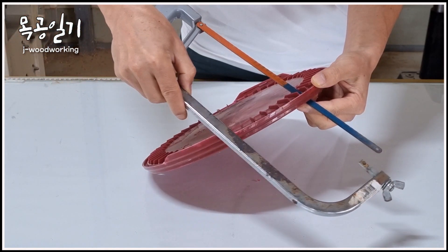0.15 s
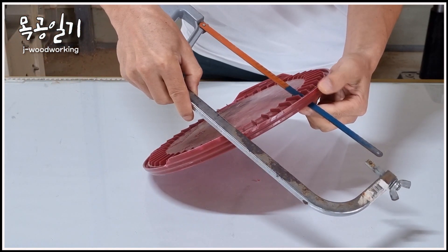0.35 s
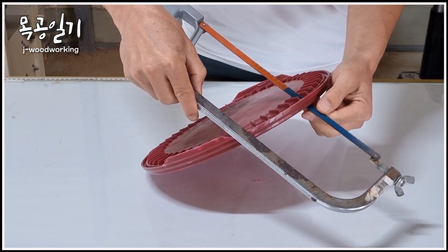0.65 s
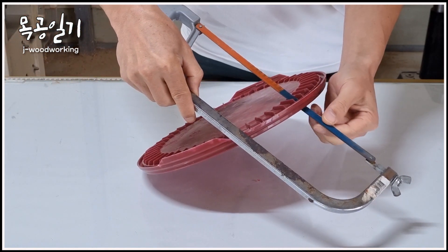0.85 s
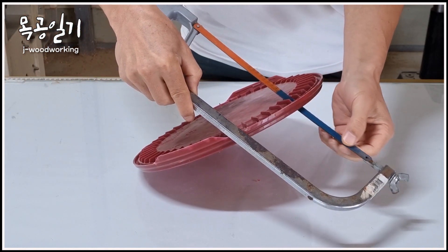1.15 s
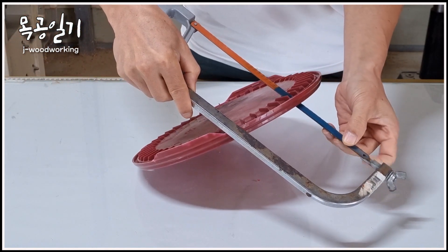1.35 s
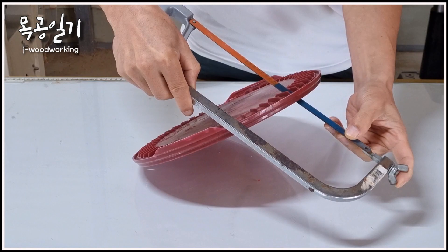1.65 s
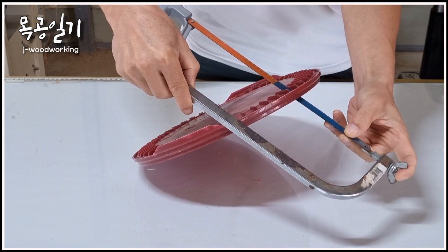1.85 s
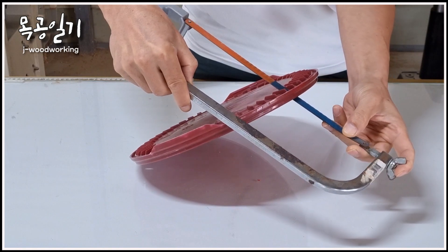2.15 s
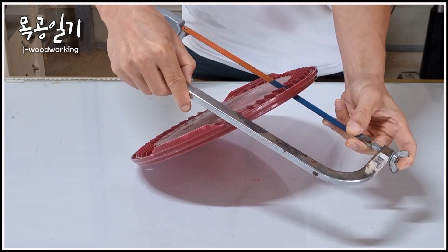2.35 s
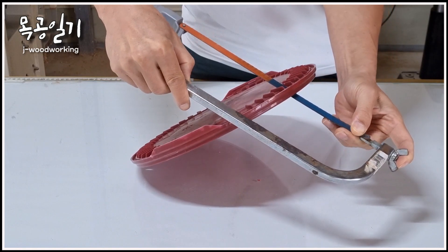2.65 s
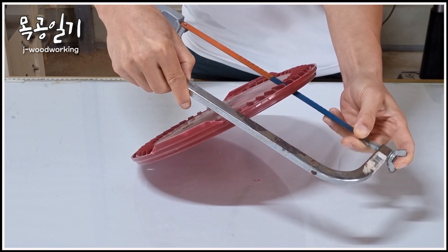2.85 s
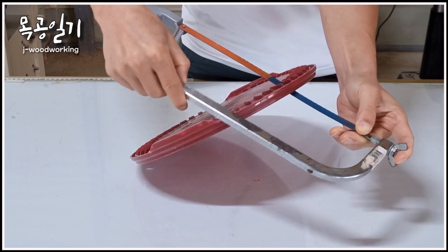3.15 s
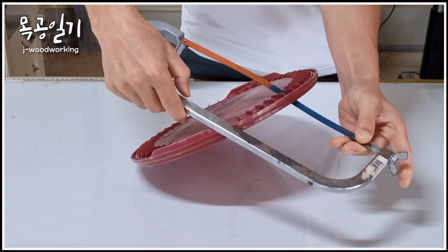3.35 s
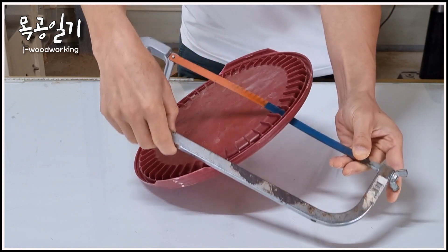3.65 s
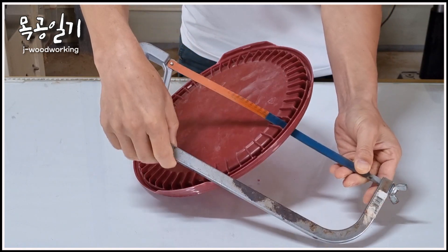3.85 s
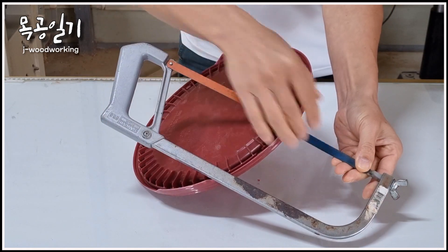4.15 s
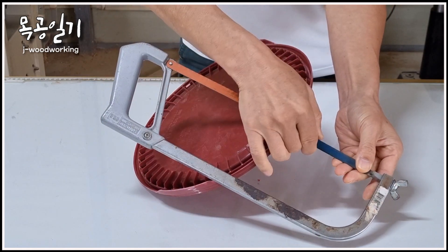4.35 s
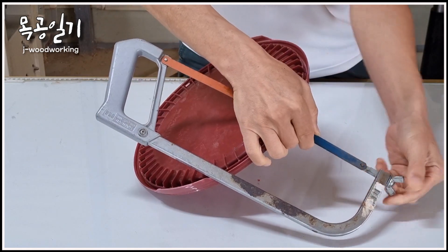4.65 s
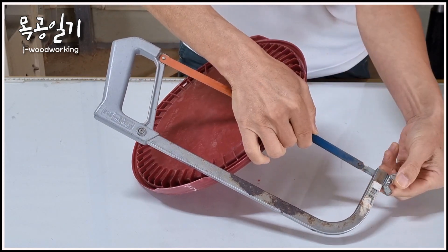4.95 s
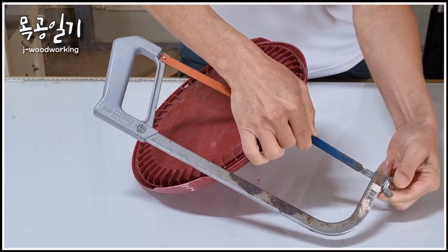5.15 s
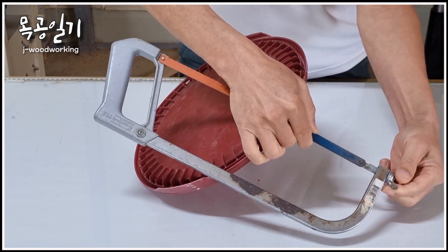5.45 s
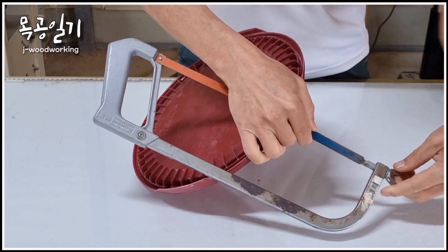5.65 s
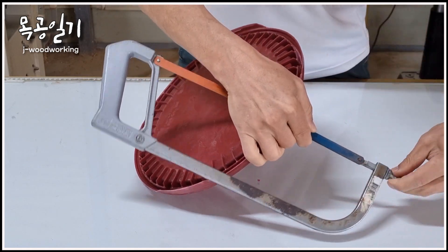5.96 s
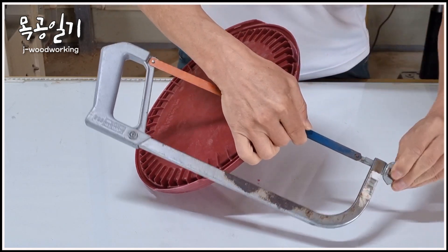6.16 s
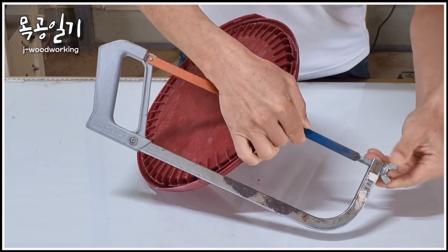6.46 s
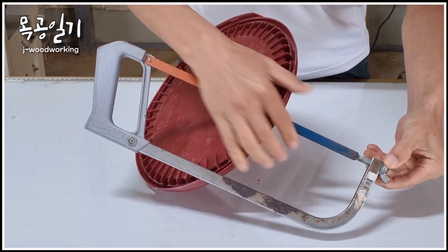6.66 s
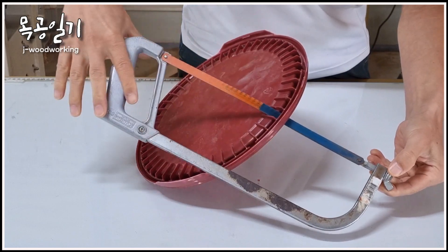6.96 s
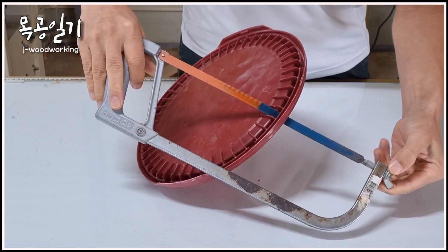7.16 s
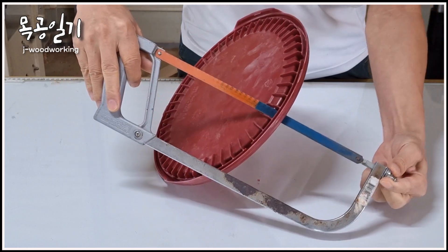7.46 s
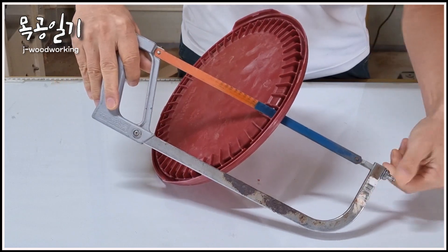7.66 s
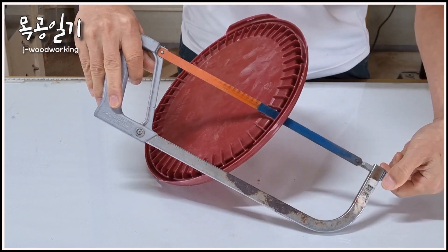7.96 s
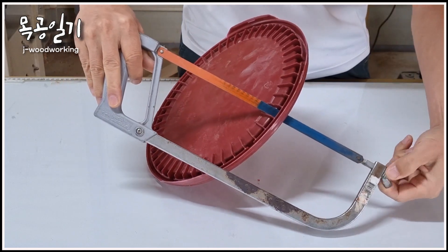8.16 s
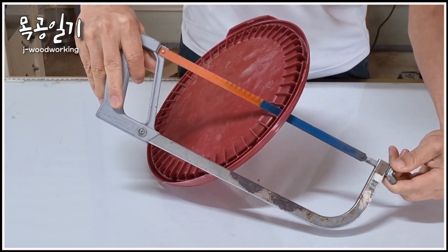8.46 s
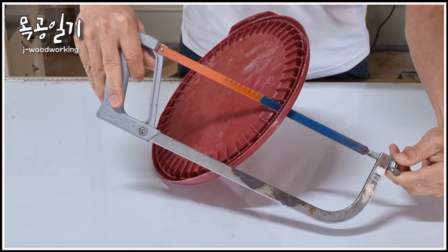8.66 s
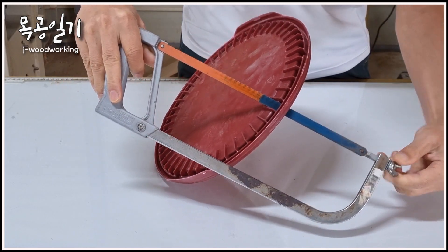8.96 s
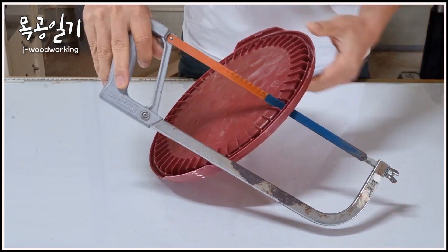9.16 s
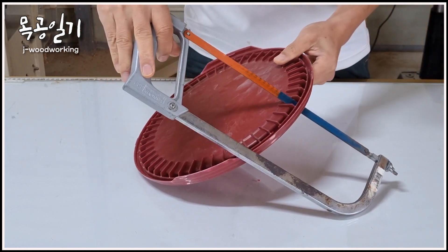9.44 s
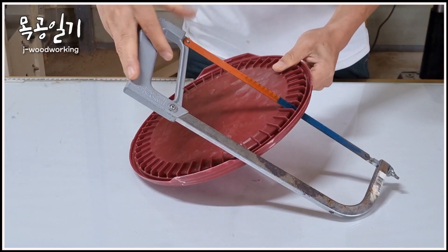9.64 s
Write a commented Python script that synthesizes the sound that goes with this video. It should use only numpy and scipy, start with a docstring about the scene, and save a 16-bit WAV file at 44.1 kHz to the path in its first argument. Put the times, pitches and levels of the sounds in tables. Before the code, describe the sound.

A small, quiet room with a steady low ventilation rumble and dull airy hiss, heard through close stereo microphones. From 0 to 2.6 seconds, barely audible dull plastic taps, tiny steel ticks and a faint scrape come from a blade being handled. At 2.6 a short squeak and ticks; at about 2.95 the blade snaps onto its pin, a loud bright crack with a brief steely ring and room echo, followed by a small click at 3.1. Faint scrapes, then near silence until 5.3, when the plastic lid knocks, again at 5.9 and 6.2, hollow, with table thumps. At 6.6 a light scrape and tick, then thin high rubbing to 7.2. A moderate frame clack at 7.9, soft muffled knocks at 8.1, 8.2 and 8.9, then a sharp, short, loud steel clack with a table thud at 9.3. Small rubs and a faint tap finish by 9.8.

```python
"""A hacksaw, close to a stereo pair of microphones, is put together on a work table in a small room.
The blade, threaded through a ribbed plastic lid, ticks, scrapes and snaps onto its pin; as the wing nut is
tightened the lid knocks and the steel frame clacks. Each blow is a noise burst plus ringing modes.
The table booms as swelling low sines, the room adds a noise-built echo, and shaped noise is the ventilation."""
import sys
import numpy as np
from scipy import signal
from scipy.fft import rfft, irfft, next_fast_len
from scipy.io import wavfile

SR = 44100
rng = np.random.default_rng(int(sys.argv[2]) if len(sys.argv) > 2 else 0)


def put_to_file(sound):
    """Save the sound as 16-bit audio at rate SR, in the file named by the first command-line argument."""
    columns = np.atleast_2d(sound).T  # one column per channel
    safe = np.clip(columns, -1, 1)
    whole_steps = np.round(safe * 32767)
    wavfile.write(sys.argv[1], SR, whole_steps.astype(np.int16))


N = 432180
RING_S = np.arange(int(.7 * SR)) / SR   # time axis of every ring and echo

# The blade catching on the frame, close by. Each row: start in seconds, level of the first 5 ms in dB,
# brightness in dB per octave, contact cut-off in Hz, favoured frequency in Hz.
SNAPS = [(2.8355, -52, -2.5, 12100, 1400), (2.951, -38, 6.5, 990, 664), (2.9572, -28.5, 0, 12000, 3400),
         (2.959, -15, 0.5, 15000, 1377), (3.138, -41.5, -6.5, 1920, 1266)]
# Modes of the tensioned saw. Each row: frequency in Hz, relative level in dB, t60 in seconds.
SAW_MODES = [(766, 9, 0.16), (889, 0, 0.2), (1017, -2, 0.28), (1260, -1.5, 0.2), (1400, 10, 0.055),
             (1470, 0.5, 0.17), (1745, 1, .33), (3324, -4, 0.26), (5146, -11, 0.2), (6270, -7, .25),
             (7000, -2, 0.25), (7600, -8, .25), (8420, -4.5, .3), (9500, -6.5, .2), (12100, -11.5, .28)]
# Colour of the saw's crowd of quickly damped modes. Each row: frequency in Hz, level in dB.
SAW_CRACK = [(160, -26), (230, -27), (320, -16), (380, -21), (460, -9.5), (560, -9), (620, -1), (690, -2.5),
             (780, 0.5), (1000, -3), (1120, -5), (1250, 0.5), (1450, 1.5), (1750, 1), (1900, -4.5),
             (2300, -2.5), (2850, -6.5), (3080, -11), (3350, -4.5), (3900, -10.5), (4900, -8.5),
             (5650, -14.5), (6300, -10), (7200, -10.5), (8000, -14.5), (8400, -9), (8900, -19),
             (9400, -9.5), (10800, -17.5), (12300, -16), (16000, -17)]


def saw_snaps():
    """The blade snaps onto its pin: a crack, then long rings of the tensioned steel."""
    return blows(SNAPS, SAW_CRACK, SAW_MODES, rise_s=0.0014, crack_t60=0.018,
                 side_db=-6.5, modes_db=-7, vary_db=1.0, pan_db=2.35)


# The lid shifting on blade and table. Each row: start in seconds, level of the first 5 ms in dB,
# brightness in dB per octave, contact cut-off in Hz, favoured frequency in Hz, table boom in dB.
KNOCKS = [(0.316, -62.5, -3, 1100, 720, -89), (.741, -59, -0.5, 1400, 710, -89),
          (1.2, -60, 1, 1600, 1020, -82), (1.8, -57.5, 4, 1500, 770, -81),
          (2.095, -54, -4.5, 1780, 695, -91), (2.158, -60, 0.5, 1500, 735, -89),
          (2.499, -64, 1, 1770, 795, -82), (5.312, -38, 0, 17000, 1400, -48),
          (5.3412, -39, 1.5, 3600, 2000, -72), (5.346, -45.5, 1, 3300, 1730, -77),
          (5.939, -38, 1, 15800, 618, -55), (5.9439, -30.5, 3.5, 6960, 1830, -48.5),
          (6.226, -32, -0.5, 16000, 590, -45.5), (6.2345, -38, 0, 11000, 4500, -73),
          (8.068, -51, -1.5, 1580, 720, -65), (8.186, -53.5, 0, 2500, 696, -61),
          (8.938, -59.5, 0.5, 1700, 669.5, -62.5), (9.718, -60.5, -0.5, 1790, 950, -66)]
# Modes of the plastic lid. Each row: frequency in Hz, relative level in dB, t60 in seconds.
LID_MODES = [(365.5, -3.5, 0.13), (506.7, -8.5, 0.1), (590, -7, 0.12), (642.6, 2, 0.1), (708, -2.5, 0.17),
             (770, -8, 0.2), (960, 1.5, 0.076), (1400, -6, 0.042), (1720, -12, 0.35), (1875, -16, 0.33),
             (2034, -6.5, 0.13), (2997, -7, 0.11), (3845, -12, 0.1)]
# Colour of the lid's crowd of quickly damped modes. Each row: frequency in Hz, level in dB.
LID_CRACK = [(120, -4.5), (230, -15.5), (295, -27), (370, -3), (450, -9), (540, -4), (650, 2), (800, -11),
             (980, -6.5), (1110, -13), (1380, -2), (1550, -15), (1850, -8), (2300, -13), (3000, -13),
             (3900, -16), (4900, -20.5), (8000, -24.5), (12000, -25), (16000, -36)]


def lid_knocks():
    """The lid knocks: a dull crack and the rings of the plastic."""
    return blows(KNOCKS, LID_CRACK, LID_MODES, rise_s=0.00055, crack_t60=0.032,
                 side_db=-5, modes_db=-4.5, vary_db=1.5, pan_db=2.0)


# The frame jumping as the tension rises. Each row: start in seconds, level of the first 5 ms in dB,
# brightness in dB per octave, contact cut-off in Hz, favoured frequency in Hz, table boom in dB.
CLACKS = [(7.8727, -35.5, -1, 9350, 1400, -48), (9.327, -23, -0.5, 13500, 5700, -34.5)]
# Modes of the hand-damped frame. Each row: frequency in Hz, relative level in dB, t60 in seconds.
FRAME_MODES = [(477, -19.5, 0.22), (1110, -12.5, 0.12), (1378, 6.5, 0.039), (1587, -8, 0.07),
               (2210, 8, 0.04), (2980, -1, 0.13), (4100, -2, 0.18), (5700, -17, 0.12), (6600, -12, 0.1)]
# Colour of the frame's crowd of quickly damped modes. Each row: frequency in Hz, level in dB.
FRAME_CRACK = [(150, -31), (400, -11.5), (550, -8), (780, -19.5), (1030, -6), (1270, -7), (1380, -7.5),
               (1700, -3), (2150, 0.5), (2600, 2), (3000, 1), (4000, 0), (6400, -7), (7400, -8),
               (10000, -15), (15000, -28)]


def frame_clacks():
    """The steel frame clacks: a sharp crack and short rings, damped by the hand."""
    return blows(CLACKS, FRAME_CRACK, FRAME_MODES, rise_s=0.00029, crack_t60=0.0236,
                 side_db=-7, modes_db=-7.5, vary_db=1.0, pan_db=0.9)


# Light touches of blade, pin and nut. Each row: start in seconds, level of the first 5 ms in dB,
# brightness in dB per octave, favoured frequency in Hz.
TICKS = [(.903, -62, -3.5, 4600), (1.153, -59, -2, 1800), (1.198, -63, -2.5, 1370), (1.404, -70.5, 5, 7700),
         (1.465, -60.5, -5, 7700), (1.68, -67, 1.5, 6500), (1.799, -69.5, 0.5, 12600),
         (2.092, -64, 13, 9700), (2.571, -61.5, -3.5, 1400), (2.616, -58.5, -0.5, 9800),
         (2.83, -58.5, -1, 10500), (2.835, -58.5, 1, 12600), (2.843, -57.5, -4.5, 1300),
         (2.885, -62.5, -0.5, 6500), (6.618, -56, -.5, 950), (6.6384, -47.5, -1, 3200),
         (6.646, -57, -4, 1400), (7.274, -57.5, -0.5, 1400), (9.577, -55, -1, 1920)]
# Modes of the slack blade. Each row: frequency in Hz, relative level in dB, t60 in seconds.
BLADE_MODES = [(950, -0.5, 0.1), (1370, 3.5, 0.1), (1789, 4.5, 0.08), (2100, 1, 0.07), (3200, -5, 0.12),
               (4500, -10.5, 0.074), (5450, -13.5, 0.09), (6500, -6, 0.062), (7700, -11, .07),
               (8630, -8.5, 0.12), (9750, -6, 0.04), (10500, -8, 0.059), (11603, -11, 0.16),
               (12600, -11.5, .08), (15250, -12, .16), (16400, -14.5, .14)]
# Colour of the crack in each tick. Each row: frequency in Hz, level in dB.
TICK_CRACK = [(200, -23), (700, 0.5), (1600, 0.5), (3000, -8.5), (6000, -13), (11000, -11.5),
              (16000, -18.5)]
TICK_CUT_HZ = 12000   # steel on steel: all contacts are equally short


def light_ticks():
    """Small steel contacts set the slack blade ringing."""
    rows = [(s, level_db, tilt_db, TICK_CUT_HZ, hz) for s, level_db, tilt_db, hz in TICKS]
    return blows(rows, TICK_CRACK, BLADE_MODES, rise_s=0.0022, crack_t60=0.03,
                 side_db=-6, modes_db=0.5, vary_db=4, pan_db=2.5, even=0.42)


# A pair of microphones hears a crack more unlike in the treble.
# Each row: frequency in Hz, gain of the left-right difference in dB.
SIDE_COLOUR = [(700, -11), (2000, -4), (6000, -0.5)]


def blows(rows, crack, modes, rise_s, crack_t60, side_db, modes_db, vary_db, pan_db, even=0.96):
    """Each contact gives a burst of crowded damped modes and the body's few long rings."""
    out, short = np.zeros((2, N)), SR // 14
    contact = (1 - np.exp(-(RING_S[:short] / rise_s) ** 2)) * fade(crack_t60, short)
    swell = (1 - fade(0.00993)) ** 2
    for s, level_db, tilt_db, cut_hz, place_hz, *_ in rows:
        shape = lambda f: touch(f, tilt_db, cut_hz, place_hz)
        burst = rng.standard_normal((2, short)) * contact
        mid, side = colour(burst, crack, shape, even)
        side = from_db(side_db) * colour(side, SIDE_COLOUR)
        ring = 0
        for hz, db, t60 in modes:
            mode_gain = from_db(db + vary_db * rng.standard_normal())
            # the place of contact sets each mode's share
            ring = ring + mode_gain * shape(hz) * mode_ring(hz, t60)
        blow = from_db(modes_db) * unit(ring * swell)
        blow[:, :short] += unit(np.array([mid + side, mid - side]))
        attack = np.sqrt(np.mean(blow[:, :SR // 200] ** 2))   # rms of the first 5 ms
        add(out, s, from_db(level_db) * blow / attack)
    return out * balance(pan_db)


PLACE_DB, PLACE_OCTAVES = 6.5, 0.1   # lift at the favoured frequency, and how far it reaches


def touch(hz, tilt_db, cut_hz, place_hz):
    """How strongly a contact excites a frequency: tilted, weak above its cut-off, strong where its place favours."""
    octaves = np.log2(np.maximum(hz, 500) / 2000)
    favour = np.exp(-(np.log2(np.maximum(hz, 1) / place_hz) / PLACE_OCTAVES) ** 2)
    return from_db(tilt_db * octaves + PLACE_DB * favour) / np.hypot(1, (hz / cut_hz) ** 2)


# unevenness of the parts splits each mode into a cluster, wider for high modes
MODE_WIDTH_HZ, MODE_WIDTH_SHARE = 15, 0.022


def mode_ring(hz, t60):
    """A mode's cluster of close partials beats unevenly as it dies, a little unlike at the two microphones."""
    t = RING_S[:int(t60 * SR)]
    beats = t * (MODE_WIDTH_HZ + MODE_WIDTH_SHARE * hz)
    envelope = (wander(beats) + 1j * wander(beats)) * fade(t60, len(t))
    ring = envelope * np.exp(2j * np.pi * hz * t)
    phases = rng.normal(0, .5, (2, 1))   # radians, one per channel
    pair = (np.exp(1j * phases) * ring).imag
    return np.pad(np.sqrt(t60) * unit(pair), [(0, 0), (0, len(RING_S) - len(t))])


# The blade scraping and squeaking on frame, pin and lid.
# Each row: start in seconds, length in seconds, level in dB, centre in Hz, width in octaves.
SLIDES = [(.07, 0.051, -67, 1870, 0.82), (0.685, 0.12, -88.5, 9150, 0.34), (1.054, 0.18, -82, 7260, 0.57),
          (2.61, 0.016, -55, 2340, 0.13), (2.612, 0.079, -84, 9800, 0.081), (3.46, 0.061, -79, 8150, 0.28),
          (3.685, 0.094, -78.5, 7830, 0.43), (5.468, 0.36, -82, 7060, 0.71),
          (5.865, 0.089, -74, 7200, 0.47), (6.607, 0.07, -55.5, 2790, 1.7),
          (6.595, 0.048, -74, 13500, 0.99), (6.839, .03, -62, 13500, 0.45),
          (6.864, 0.032, -60.5, 13500, 0.48), (6.926, 0.14, -81.5, 13000, .5),
          (6.988, 0.096, -76.5, 13500, .6), (7.05, 0.055, -77, 6940, 0.64), (7.096, 0.17, -79, 9700, 0.12),
          (7.818, 0.068, -75, 8000, 0.46), (8.224, 0.076, -72, 4850, 0.54), (9.499, 0.12, -66.5, 14000, .6),
          (9.7, 0.2, -85.5, 12500, .5)]
# friction broadens the modes and drives each by this power of its ring time
SQUEAK_WIDTH_HZ, SQUEAK_FAVOUR = 300, 1.5
# below this frequency a toneless rasp fills the gaps between the modes
RASP_SHARE, RASP_HZ = 0.66, 8000


def slides(grain_db, slip_s):
    """Sliding parts make the blade's modes within a band rasp or sing, the least damped most."""
    out, size = np.zeros((2, N)), next_fast_len(len(RING_S))
    f = np.arange(size // 2 + 1) * SR / size
    blade = sum(t60 ** SQUEAK_FAVOUR / (1 + (2 * (f - hz) / SQUEAK_WIDTH_HZ) ** 2)
                for hz, _, t60 in BLADE_MODES)
    blade = blade / blade.max() + RASP_SHARE / (1 + (f / RASP_HZ) ** 4)
    for s, length, level_db, hz, octaves in SLIDES:
        slips = band(friction(length, grain_db, slip_s), hz, octaves)
        rub = irfft(rfft(slips, size) * blade, size)[:, :slips.shape[-1]]
        add(out, s, from_db(level_db) * unit(rub) * np.sqrt(length * SR / 2))
    return out


def friction(length, grain_db, slip_s):
    """Uneven slips swell and fade over one stroke."""
    t = RING_S[:int((length + .03) * SR)]
    stroke = np.sin(np.pi * np.minimum(t / length, 1)) ** 2
    return stereo_noise(len(t), alike=0.48) * stroke * from_db(grain_db * wander(t / slip_s))


# Low modes of the table under the parts.
# Each row: frequency in Hz, relative level in dB, time to peak in seconds.
BOOM_MODES = [(162.8, 0.5, 0.034), (142, -13, 0.037), (204.6, -18.5, 0.032), (262.4, -22, 0.03),
              (341, -31, 0.022), (385, -23, 0.034), (476, -20, 0.038)]


def table_boom():
    """The table's low modes swell in the room after a blow, then die."""
    out = np.zeros((2, N))
    for s, *_, boom_db in KNOCKS + CLACKS:
        for hz, db, peak_s in BOOM_MODES:
            swell = (RING_S / peak_s * np.exp(1 - RING_S / peak_s)) ** 2
            tone = swell * np.sin(2 * np.pi * hz * RING_S)
            add(out, s, from_db(boom_db + db) * tone * balance(1.4))
    return out


# Decay of the small room. Each row: frequency in Hz, t60 in seconds, left-right likeness from -1 to 1.
ROOM_T60 = [(150.6, 0.53, 1), (600, .35, 0.63), (1700, 0.4, -.2), (4100, 0.55, -0.1), (6967, 0.53, 0.4),
            (11000, 0.39, .7), (16000, .42, 0.47)]
# Colour of the room's echo. Each row: frequency in Hz, level in dB.
ROOM_COLOUR = [(100, -3), (500, 3), (1500, -1), (2600, -4), (4500, 0), (6500, 0.5), (9000, -2),
               (13000, -0.5), (16000, -3.5)]


def room(x, build_s, grain_db, grain_s):
    """Echoes build up within milliseconds, arrive in clumps and die band by band."""
    hz, tail = np.linspace(0, SR / 2, len(RING_S) // 2 + 1), 0
    mid, side = rfft(rng.standard_normal((2, len(RING_S))))
    for centre, t60, alike in ROOM_T60:
        share = at_hz([(f, f == centre) for f, *_ in ROOM_T60], hz)   # bands cross-fade
        white = spread(mid, side, alike)
        tail = tail + irfft(white * share, len(RING_S)) * fade(t60)
    clumps = from_db(grain_db * wander(RING_S / grain_s))
    build = 1 - np.exp(-(RING_S / build_s) ** 2)
    tail = colour(unit(tail * clumps * build), ROOM_COLOUR)
    return signal.fftconvolve(x, tail, axes=-1)[:, :N]


# Spectrum of the ventilation's rumble. Each row: frequency in Hz, relative level in dB per Hz.
RUMBLE = [(15, -62), (25, -50), (39, -24.5), (54, -14), (73, -9.5), (91, 2.5), (150, -1), (188, -8),
          (241, -15), (330, -23.5), (430, -40.5), (730, -120)]
# Spectrum of the ventilation's hiss. Each row: frequency in Hz, relative level in dB per Hz.
HISS = [(200, -19.5), (300, -5), (430, -0.5), (600, -3.5), (1000, -3), (1400, 0), (2000, -1), (2600, -9),
        (3100, -16), (3700, -29), (6000, -31.5), (9000, -42.5), (12000, -37.5), (16000, -45.5)]
# Slow drift of the rumble. Each row: time in seconds, level in dB before rumble_db is added.
RUMBLE_LEVEL = [(0.0, -69.5), (0.54, -74), (0.98, -69.5), (2.21, -71.5), (2.51, -67.5), (3.41, -71.5),
                (3.79, -67.5), (9.8, -73)]
# Slow drift of the hiss. Each row: time in seconds, level in dB before hiss_db is added.
HISS_LEVEL = [(0.0, -69.5), (6.36, -66.5), (9.8, -69)]


def ventilation(rumble_db, hiss_db, pan_db):
    """A low rumble and a dull hiss fill the room, both drifting slowly."""
    t = np.arange(N) / SR
    rumble = from_db(np.interp(t, *np.transpose(RUMBLE_LEVEL)) + rumble_db) * air_noise(RUMBLE)
    hiss = from_db(np.interp(t, *np.transpose(HISS_LEVEL)) + hiss_db) * air_noise(HISS)
    return rumble * balance(pan_db) + hiss


# How alike the ventilation is at the two microphones. Each row: frequency in Hz, likeness from 0 to 1.
LIKENESS = [(60, 1), (150, 1), (400, 0.92), (1000, 0.99), (2400, 0.31), (6000, 0.11), (15000, 0.1097)]
FAN_LAG_S = 0.00027   # the ventilation is heard this much later on the left


def air_noise(spectrum):
    """Steady noise of rms one that reaches the left microphone later, and is diffuse in the treble."""
    hz = np.arange(N // 2 + 1) * SR / N
    mid, side = rfft(rng.standard_normal((2, N)))
    both = spread(mid, side, np.clip(at_hz(LIKENESS, hz), 0, .99))
    both[0] *= np.exp(-2j * np.pi * hz * FAN_LAG_S)
    return unit(irfft(both * from_db(at_hz(spectrum, hz)), N)) * np.sqrt(N)


def from_db(db):
    """Decibels to gain."""
    return 10 ** (np.asarray(db) / 20)


def balance(pan_db):
    """Gains that make the left channel louder than the right by pan_db."""
    return from_db([[pan_db / 2], [-pan_db / 2]])


def unit(x):
    """Scale to a mean energy of one per channel."""
    return x / np.sqrt(np.mean(np.sum(x ** 2, axis=-1)) + 1e-30)


def at_hz(points, hz):
    """Read a table along a log-frequency axis."""
    known_hz, values = np.transpose(points)
    return np.interp(np.log(np.maximum(hz, 1)), np.log(known_hz), values)


def fade(t60, size=len(RING_S)):
    """Free decay of a vibration, by 60 dB in t60 seconds."""
    return np.exp(-np.log(1000) * RING_S[:size] / max(t60, 1e-4))


def colour(x, spectrum, shape=np.ones_like, even=0):
    """Causal (minimum-phase) filter: spectrum times shape; `even` smooths away the input's own peaks."""
    size = 2 * next_fast_len(x.shape[-1])
    hz, bins = np.arange(size // 2 + 1) * SR / size, rfft(x, size)
    gain = from_db(at_hz(spectrum, hz)) * shape(hz)
    cepstrum = irfft(np.log(gain) - even * np.log(np.abs(bins) + 1e-9))
    # folding the cepstrum onto positive times makes the filter causal
    cepstrum[..., 1:size // 2] *= 2
    cepstrum[..., size // 2 + 1:] = 0
    return irfft(bins * np.exp(rfft(cepstrum)))[..., :x.shape[-1]]


def band(x, hz, octaves):
    """A resonance of the given centre and width."""
    edges = np.minimum(hz * 2 ** (np.array([-.5, .5]) * octaves), [.4 * SR, .45 * SR])
    return signal.sosfilt(signal.butter(2, edges, "band", fs=SR, output="sos"), x + 1e-18)


def spread(mid, side, alike):
    """Two channels of the given correlation from two independent noises."""
    return np.sqrt(1 + alike) * mid + np.sqrt(1 - alike) * np.array([side, -side])


def stereo_noise(size, alike):
    """White noise in two channels with the given correlation."""
    mid, side = rng.standard_normal((2, size))
    return spread(mid, side, alike) / np.sqrt(2)


def wander(steps):
    """A chance value of spread about one that moves on to a new one at every whole step."""
    return np.interp(steps, np.arange(1024), rng.standard_normal(1024))


def add(track, s, sound):
    """Mix a sound into a track at time s."""
    start = int(s * SR)
    track[:, start:start + sound.shape[-1]] += sound[:, :N - start]


def scene():
    """Saw, lid and frame sound close by; the room answers them over table boom and ventilation."""
    saw, lid, frame = saw_snaps(), lid_knocks(), frame_clacks()
    small = light_ticks() + slides(grain_db=4, slip_s=0.0057)
    into_room = from_db(-4.0) * saw + from_db(-3.0) * lid + from_db(-1.94) * frame + from_db(-5.5) * small
    echo = room(into_room, build_s=0.00055, grain_db=1.5, grain_s=0.0027)
    # small parts radiate no deep bass
    high_pass = signal.butter(2, 120, "high", fs=SR, output="sos")
    parts = signal.sosfilt(high_pass, saw + lid + frame + small + echo)
    return parts + table_boom() + ventilation(rumble_db=5.0, hiss_db=6.0, pan_db=3.0)


CUTOFF_HZ = 16700


def record(dry):
    """The top is cut steeply by an elliptic low-pass."""
    return signal.sosfilt(signal.ellip(10, .1, 70, CUTOFF_HZ, fs=SR, output="sos"), dry)


dry = scene()
out = record(dry)
put_to_file(out)
```